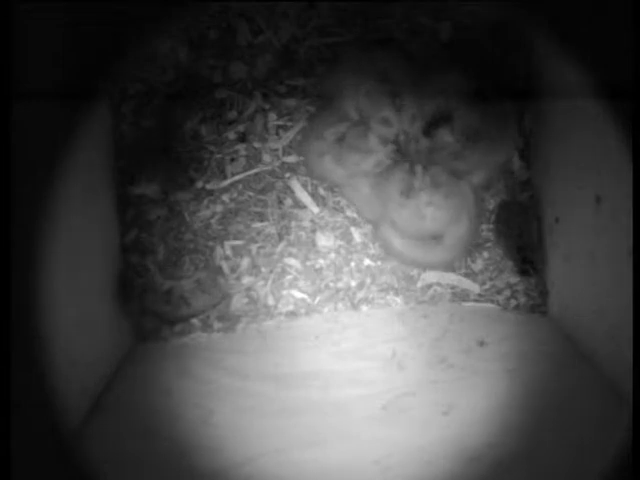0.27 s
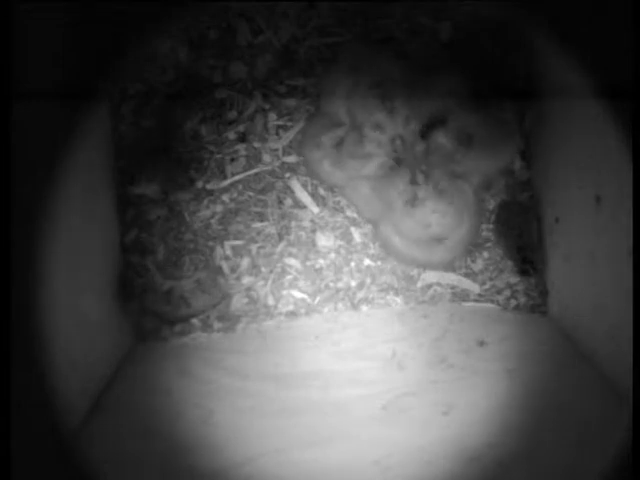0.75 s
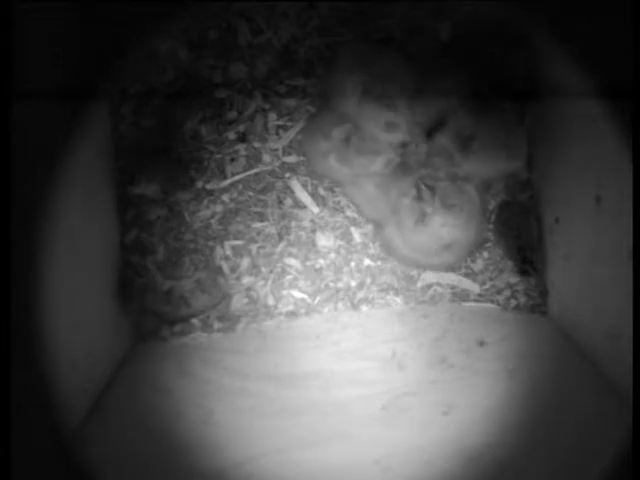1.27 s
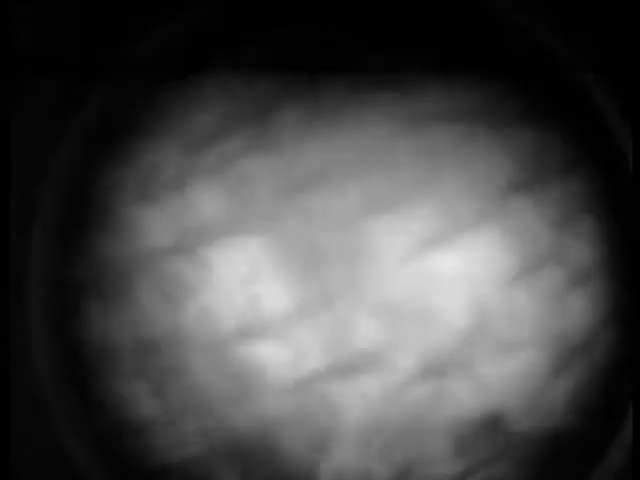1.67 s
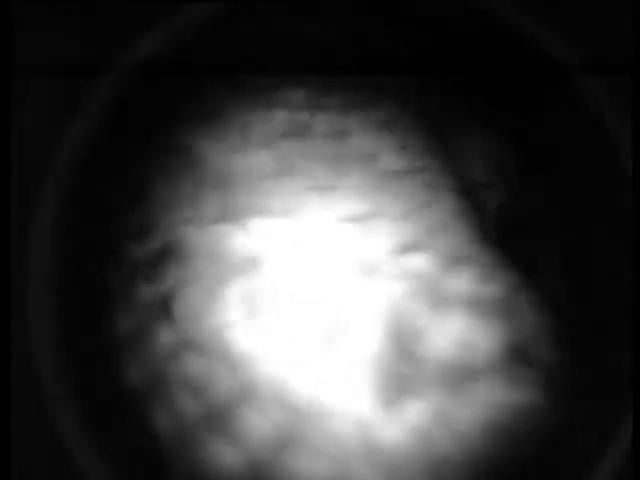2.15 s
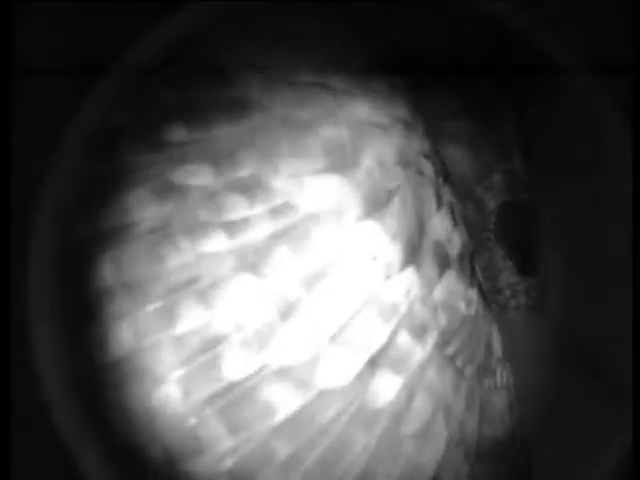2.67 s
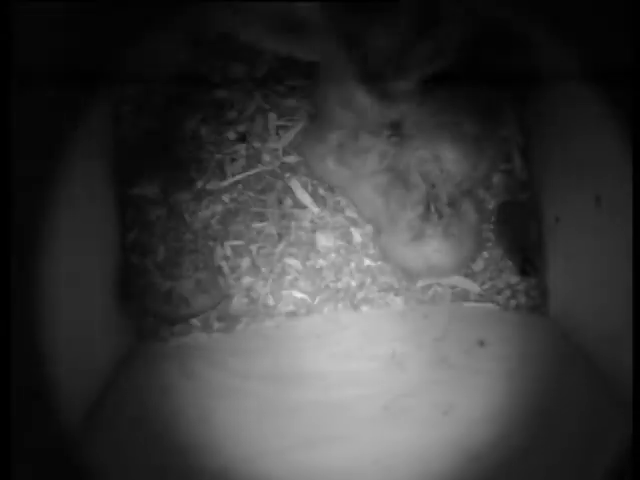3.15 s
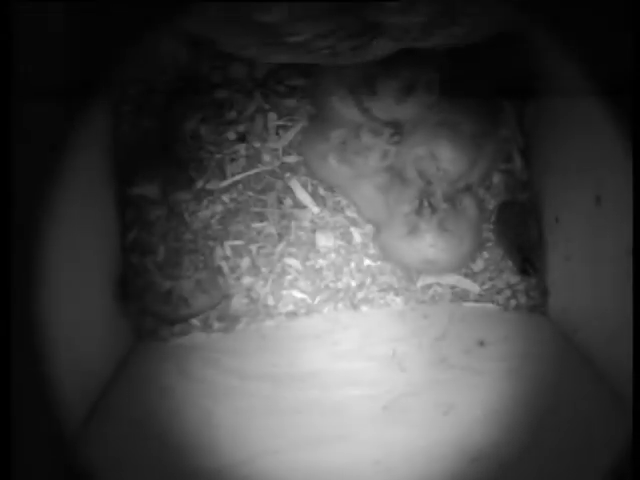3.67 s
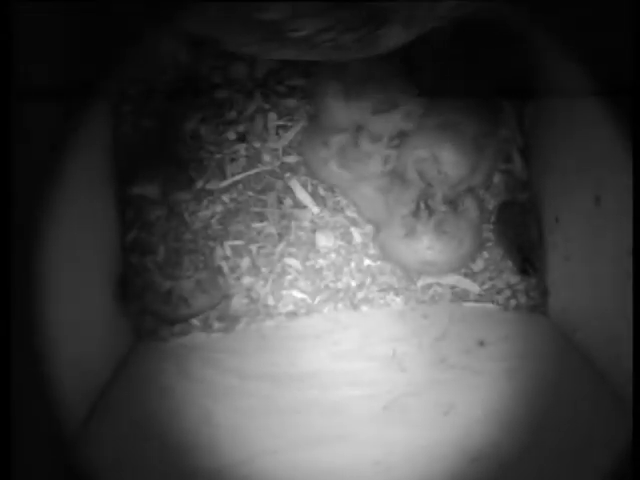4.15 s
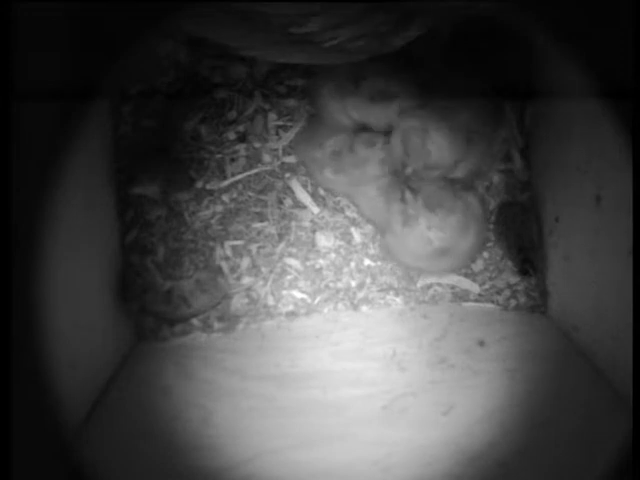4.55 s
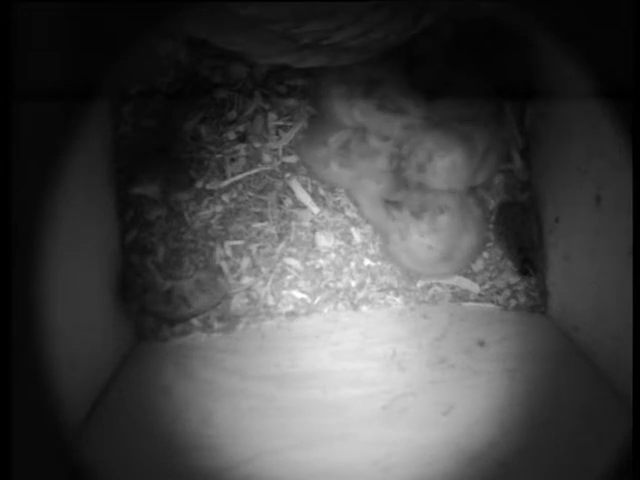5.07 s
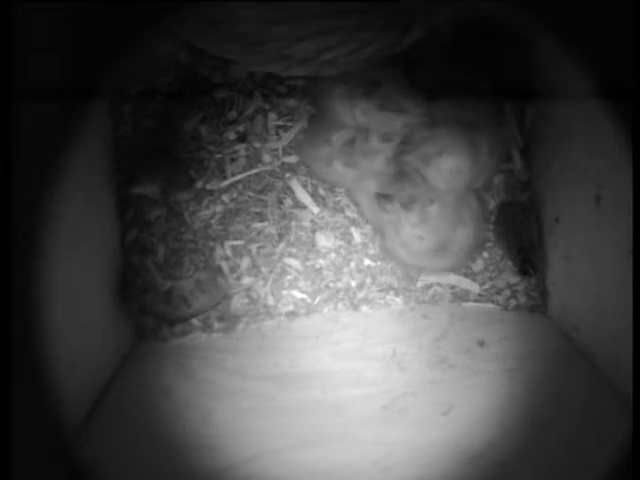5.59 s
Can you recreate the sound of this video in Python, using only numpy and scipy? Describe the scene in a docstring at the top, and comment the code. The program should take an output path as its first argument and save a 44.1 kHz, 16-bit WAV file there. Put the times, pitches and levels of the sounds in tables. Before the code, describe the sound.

In a buzzing nest box, owl chicks rasp briefly three times while a parent lands with hard knocks, scratches and feather rustle.

```python
"""In a wooden nest box, owl chicks beg: three hoarse hisses, resonated noise of throat and beak,
each with a thin gliding tone, the whistle, that breaks through and slides down.
A parent lands, knocks and scrabbles on the boards (struck modes, dense grains) and brushes past the nest
camera with its feathers (coloured noise). The camera's one microphone feeds the left channel,
over the buzz and line whistle of its picture signal; the right channel carries only a faint hiss."""
import sys
import numpy as np
from scipy import signal
from scipy.fft import rfft, irfft, next_fast_len
from scipy.io import wavfile

SR = 44100
rng = np.random.default_rng(int(sys.argv[2]) if len(sys.argv) > 2 else 0)


def dump(signal):
    """Clip the signal to [-1, 1] and save it as 16-bit WAV at the path in sys.argv[1]."""
    limited = np.clip(np.atleast_2d(signal).T, -1, 1)
    pcm = np.round(limited * 32767).astype(np.int16)
    wavfile.write(sys.argv[1], SR, pcm)


N = 256662
TIME = np.arange(N) / SR
# Levels in tables and settings are relative: the mixing gains and the microphone's gain come on top.


def from_db(db):
    """Decibels to gain."""
    return 10 ** (np.asarray(db) / 20)


def rms_one(x):
    """Scale to unit power."""
    return x / np.sqrt(np.mean(x ** 2) + 1e-20)


def in_time(rows, t):
    """The columns of a curve at times t."""
    s, *columns = np.transpose(rows)
    return [np.interp(t, s, c) for c in columns]


def add(out, s, x):
    """Mix x in at time s."""
    i = max(int(s * SR), 0)
    out[i:i + len(x)] += x[:N - i]


def band(x, edges):
    """Causal band-pass."""
    return signal.sosfilt(signal.butter(2, edges, "band", fs=SR, output="sos"), x)


def noise(spectrum, n):
    """Noise of a given colour, rms 1."""
    hz, db = np.transpose(spectrum)
    size = next_fast_len(n)
    f = np.maximum(np.arange(size // 2 + 1) * SR / size, 1)
    colour = from_db(np.interp(np.log(f), np.log(hz), db, left=-80))
    white = rfft(rng.standard_normal(size))
    return rms_one(irfft(white * colour, size)[:n])


def drift(rate, n):
    """Chance values, `rate` a second, joined by straight lines; rms 1."""
    at = np.arange(n) * rate / SR
    count = int(at[-1]) + 2
    return rms_one(np.interp(at, np.arange(count), rng.standard_normal(count)))


def resonate(x, resonances):
    """Parallel resonances with alternating signs; rms 1."""
    out = 0
    for k, (hz, width, db) in enumerate(resonances):
        r = np.exp(-np.pi * width / SR)
        poles = [1, -2 * r * np.cos(2 * np.pi * hz / SR), r * r]
        ring = (1 - r * r) * signal.lfilter([1, 0, -1], poles, x)
        out = out + (-1) ** k * from_db(db) * ring
    return rms_one(out)


def ramps(t, length, attack_s, release_s):
    """Straight attack, hold and release within the given length."""
    return np.clip(np.minimum(t / attack_s, (length - t) / release_s), 0, 1)


def gesture(s, length, attack_s, release_s):
    """A movement that builds up, holds and dies away."""
    rise = np.clip((TIME - s) / attack_s, 0, 1)
    return rise * np.exp(-np.clip((TIME - s - length) / release_s, 0, 20))


def bell(t, width):
    """A smooth hump of height 1 around t = 0."""
    return np.exp(-(t / width) ** 2)


def tone(hz, db, rough, jitter, jitter_rate, flutter_db, octave_db):
    """A gliding tone with its octave; roughness shakes both pitch and strength."""
    shaken_hz = hz * (1 + jitter * rough * drift(jitter_rate, len(hz)))
    phase = 2 * np.pi * np.cumsum(shaken_hz) / SR
    level = from_db(db + flutter_db * rough * drift(jitter_rate / 2, len(hz)))
    return np.sqrt(2) * level * (np.sin(phase) + from_db(octave_db) * np.sin(2 * phase))


ACCENT_S, CHIRP_DB, HISS_ACCENT_DB = 0.0218, 16.5, 7   # a call starts with a brief accent
BURIED_DB, BURIED_SWELL_DB, BURIED_ROUGH = -55.5, 13, 0.3965   # the high voice while lost in the hiss
BREAK_S, WHISTLE_SWELL_DB = 0.00275, 4.5   # how fast the whistle breaks through; it grows with the push
LOW_VOICE_HZ, LOW_BUILD_S, LOW_BUILD_DB = 4548, 0.0922, 25.5   # the low voice builds up towards the end
SWELL_S, BEAK_SWELL_DB = 0.0556, 9.5   # the hiss swells around the push for about this long
# Begging calls in the box, each with one late push of effort: (time [s], length [s], push after [s],
# push width [s], rest pitch [Hz], top pitch [Hz], pitch dip at the push [Hz], whistle clear after [s],
# whistle length [s], whistle level [dB], its roughness [0-1], low voice level [dB], its roughness [0-1],
# throat hiss level [dB], beak hiss level [dB], throat swell [dB])
BEGGING_CALLS = [(.651, .256, .186, 0.042, 4008, 7177, 920, 0.1617, 0.0478, -39.5, 0.08, -36.5, 0.19, -43, -54.5, 0),
                 (2.365, 0.2518, .222, .050, 3625, 7888, 1600, 0.1605, 0.0684, -33.5, 0.18, -35, .42, -49.5, -48, 3.5),
                 (4.176, .285, 0.2024, 0.033, 3670, 7774, 1905, 0.1443, 0.1302, -37.5, .27, -52, 0.63, -48, -52.5, 8)]


def chicks():
    """Each call opens with an accent; a late push swells the hiss and bends the clear whistle down."""
    out = np.zeros(N)
    for (s, length, push_s, push_width, rest_hz, top_hz, dip_hz, clear_s, clear_length, clear_db, rough,
         low_db, low_rough, throat_db, beak_db, swell_db) in BEGGING_CALLS:
        t = TIME[:int(length * SR)]
        accent = np.exp(-t / ACCENT_S)
        push = bell(t - push_s, push_width)
        swell = bell(t - push_s, SWELL_S)

        # 0 while the high voice is buried, 1 while it whistles clear
        opening = np.tanh((t - clear_s) / BREAK_S)
        closing = np.tanh((t - clear_s - clear_length) / BREAK_S)
        clear = (opening - closing) / 2
        buried_db = BURIED_DB + CHIRP_DB * accent + BURIED_SWELL_DB * swell
        high_db = buried_db + (clear_db + WHISTLE_SWELL_DB * push - buried_db) * clear
        high_rough = BURIED_ROUGH + (rough - BURIED_ROUGH) * clear
        high = whistle(t, length, rest_hz, top_hz - dip_hz * push, high_db, high_rough)

        build_db = -LOW_BUILD_DB * (1 - bell(length - t, LOW_BUILD_S))
        low = whistle(t, length, rest_hz, LOW_VOICE_HZ, low_db + build_db + CHIRP_DB * accent, low_rough)

        throat_now_db = throat_db + HISS_ACCENT_DB * accent + swell_db * swell
        beak_now_db = beak_db + HISS_ACCENT_DB * accent + BEAK_SWELL_DB * swell
        add(out, s, high + low + hiss(t, length, throat_now_db, beak_now_db))
    return out


def whistle(t, length, rest_hz, held_hz, db, rough, ramp_s=0.0043, rise_s=.011, fall_s=.016):
    """One voice of the syrinx: it tenses up to its held pitch and slackens as the call ends."""
    tension = (1 - np.exp(-t / rise_s)) * (1 - bell(length - t, fall_s))
    hz = rest_hz + (held_hz - rest_hz) * tension
    voice = tone(hz, db, rough, jitter=0.0697, jitter_rate=2200, flutter_db=11.5, octave_db=-29.5)
    return ramps(t, length, ramp_s, ramp_s) * voice


THROAT_ATTACK_S, THROAT_RELEASE_S, BEAK_RAMP_S = 0.0287, 0.0292, 0.0089
# Resonances of a chick's throat: (frequency [Hz], width [Hz], level [dB])
THROAT_RESONANCES = [(781, 235, -0.5), (1724, 237, -1.5), (2730, 515, -2), (3297, 398, 0.5),
                     (4333, 840, -3.5)]
# Resonances of its open beak: (frequency [Hz], width [Hz], level [dB])
BEAK_RESONANCES = [(5040, 107, 9.9), (5930, 310, 5.2), (6290, 183, 5.3), (7320, 1240, 2.7)]


def hiss(t, length, throat_db, beak_db, rasp_db=2.13, rasp_rate=600, air_db=-7,
         air_edges_hz=(1500, 9000), beak_edges_hz=(4300, 8600)):
    """Turbulent air through throat and open beak, rasping as the membranes flap."""
    rasp = from_db(rasp_db * drift(rasp_rate, len(t)))
    deep, front, air = rng.standard_normal((3, len(t))) * rasp
    throat = resonate(band(deep, (550, 9000)), THROAT_RESONANCES)
    throat = throat + from_db(air_db) * rms_one(band(air, air_edges_hz))
    beak = resonate(band(front, beak_edges_hz), BEAK_RESONANCES)
    throat_shape = ramps(t, length, THROAT_ATTACK_S, THROAT_RELEASE_S) ** 2
    beak_shape = ramps(t, length, BEAK_RAMP_S, BEAK_RAMP_S)
    return from_db(throat_db) * throat_shape * throat + from_db(beak_db) * beak_shape * beak


def walls(x, first=0.062, second=0.293, tail_db=-21, tail_t60=0.177):
    """Two early reflections, about 0.5 m and 1.3 m longer in path, and a faint tail colour the voices."""
    t = TIME[:SR // 4]
    tail = rng.standard_normal(len(t)) * from_db(-60 * t / tail_t60)
    echoes = from_db(tail_db) * signal.fftconvolve(x, tail / np.linalg.norm(tail))[:N]
    near = np.interp(TIME - .0015, TIME, x)
    far = np.interp(TIME - .0037, TIME, x)
    return x - first * near + second * far + echoes


# Zones of pitch in a knock: (low edge [Hz], high edge [Hz])
KNOCK_ZONES = [(400, 1500), (1500, 4200), (4200, 14000)]
EDGE_DB = 3   # the middle zone of every knock is raised
# Claws and beak on the wood: (time [s], level [dB], tilt from one zone to the next [dB], skid [s])
WOOD_KNOCKS = [(.971, -48, 0, 0.0028), (1.1147, -41, 2, 0.00463), (1.1735, -40, 5, 0.0042),
               (1.308, -44, 1.5, 0.00134), (1.361, -44, -1.5, 0.00168), (1.4165, -42.5, 3.5, 0.00152),
               (1.4441, -29, -0.5, 0.00645), (1.6399, -29, -9, 0.00072), (1.652, -24, -0.5, 0.0085),
               (1.6597, -19, -6, 0.00098), (1.671, -24.5, 0, 0.00288), (1.688, -30.5, -8, .0019),
               (1.709, -29.5, -5.5, 0.0026), (1.7209, -24.5, -5.5, 0.00189), (1.752, -31.5, -6, 0.00295),
               (1.8039, -25, 1, 0.00314), (1.9693, -40, -6, 0.00195), (2.008, -39, -5.5, 0.0058),
               (2.056, -37.5, -1, 0.0039), (2.0817, -41.5, -4, 0.00165), (2.104, -36, 3, 0.00177),
               (2.1182, -30, -2.5, .0056), (2.165, -29.5, 2.5, 0.00476)]


def knocks(strike=3, debris_db=-24, debris_s=0.00786, crack_db=-7, claw_db=-5, claw_hz=(1100, 6800),
           claw_width_hz=190, edges_hz=(850, 10500)):
    """A claw hits and skids: a short skid rings clear, a long one scratches."""
    out, t = np.zeros(N), TIME[:SR // 5]
    for s, level_db, tilt_db, skid_s in WOOD_KNOCKS:
        skid = rng.standard_normal(len(t)) * t / skid_s * np.exp(1 - 2 * t / skid_s)
        # debris rattles on for a moment after the contact
        debris = rng.standard_normal(len(t)) ** 3 * np.exp(-t / debris_s)
        skid = skid + from_db(debris_db) * debris
        force = skid + strike * (t == 0)
        # each spot of plank or twig adds a few short, high resonances of its own
        spot = resonate(force, [(hz, claw_width_hz, 0) for hz in rng.uniform(*claw_hz, size=9)])
        boards = rms_one(box(force, BOX_MODES[5:], vary_db=4.0))
        sound = boards + from_db(claw_db) * spot + from_db(crack_db) * rms_one(skid)
        sound = band(sound, edges_hz)
        for edges, db in zip(KNOCK_ZONES, (-tilt_db, EDGE_DB, tilt_db)):
            part = band(sound, edges)
            start_level = np.std(part[:SR // 50])   # over the first 20 ms
            add(out, s, from_db(level_db + db) * part / start_level)
    return out


# Modes of the nest box: (frequency [Hz], level [dB], 60 dB decay time [s])
BOX_MODES = [(76.89, 2.5, 0.0705), (102.2, -6.5, 0.308), (179.47, -2.5, 0.0562), (278.06, -2, .18),
             (324.1, 0, 0.141), (434.4, -9, 0.1692), (597.6, -11.5, 0.1087), (684.6, -0.5, 0.0398),
             (899.2, 0, 0.0335), (997.3, 3.5, 0.0554), (1213, -5, 0.014), (1945, -11, 0.034),
             (2320, -15, 0.048), (3111, 0.5, 0.021), (3201.6, -1, 0.058)]


def box(force, modes, vary_db):
    """The boards ring as decaying modes; each place of contact favours other ones."""
    out = np.zeros(len(force))
    for hz, db, t60 in modes:
        r, w = from_db(-60 / (t60 * SR)), 2 * np.pi * hz / SR
        ring = signal.lfilter([0, np.sin(w)], [1, -2 * r * np.cos(w), r * r], force + 1e-18)
        out += from_db(db + vary_db * rng.standard_normal()) * ring
    return out


# Soft footfalls and bumps: (time [s], floor boom level [dB], board ring level [dB])
SOFT_BUMPS = [(.051, -17, -19), (.552, -37.5, -55.5), (.819, -27, -36.5), (1.176, -26.5, -37.5),
              (1.458, -24.5, -28), (1.638, -17, -19.5), (1.97, -47.5, -22), (2.01, -38, -19.5),
              (2.051, -23, -28.5), (2.117, -15.5, -24.5), (2.342, -32.5, -24), (2.646, -43, -31.5),
              (3.261, -62, -42.5), (4.465, -39, -60.5)]


def bumps(contact_s=0.003044, soft_hz=520):
    """Padded blows push the floor and reach only its lower modes."""
    out, t = np.zeros(N), TIME[:SR // 2]
    push = band(np.sin(np.pi * np.minimum(t / contact_s, 1)) ** 2, (55, soft_hz))
    for s, boom_db, board_db in SOFT_BUMPS:
        for modes, db in ((BOX_MODES[:2], boom_db), (BOX_MODES[2:6], board_db)):
            sound = box(push, modes, vary_db=2)
            add(out, s, from_db(db) * sound / np.abs(sound).max())
    return out


# The parent's feet drag through the litter: (time [s], length [s], level [dB])
FOOT_SCUFFS = [(0.936, 0.027, -46), (1.13, 0.0444, -40), (1.356, 0.0258, -43), (1.431, 0.0461, -35.5),
               (1.636, 0.0318, -21.5), (1.851, 0.0357, -41.5), (1.987, 0.076, -31), (2.104, 0.066, -30.5),
               (2.309, 0.0293, -41), (2.615, 0.0594, -43), (2.779, 0.0885, -50)]
SCUFF_ATTACK_S, SCUFF_RELEASE_S = .008, 0.02116
# Plumage sweeps past the camera, swelling and stopping short: (time [s], length [s], level [dB])
FEATHER_SWEEPS = [(2.251, 0.0964, -41), (2.833, 0.1197, -49.5)]
SWEEP_RELEASE_S = 0.0214
# Light rustle while the parent moves about: (time [s], level [dB])
LIGHT_RUSTLE = [(.85, -55.5), (1.35, -50.5), (1.6, -45), (1.95, -43.5), (2.2, -40.5), (2.4, -49.5),
                (2.72, -55.5), (2.95, -53), (3.15, -67), (3.7, -65)]
FEATHER_FOLLOW_DB = -14   # feathers stir with every move of the feet
# Colour of brushing feathers: (frequency [Hz], level [dB])
FEATHER_COLOUR = [(1200, -9.5), (2400, 10), (7500, 1), (10000, 0), (15000, -7.5)]


def shuffle(grains_per_s=1700, grain_db=3.5, scrape_db=-3, crunch_db=0, wood_edges_hz=(180, 1800),
            crunch_edges_hz=(270, 1500), feather_db=-1.5, flutter_db=3.0, crackle_db=-1):
    """Litter and claws tick densely on the boards while feathers brush the walls."""
    rustle_db, = in_time(LIGHT_RUSTLE, TIME)
    rustle = from_db(rustle_db) * (TIME > LIGHT_RUSTLE[0][0]) * (TIME < LIGHT_RUSTLE[-1][0])
    scuffs = sum(from_db(db) * gesture(s, length, SCUFF_ATTACK_S, SCUFF_RELEASE_S)
                 for s, length, db in FOOT_SCUFFS)
    sweeps = sum(from_db(db) * gesture(s, length, length, SWEEP_RELEASE_S)
                 for s, length, db in FEATHER_SWEEPS)
    scraping = np.hypot(rustle, scuffs)
    feathers = np.hypot(from_db(FEATHER_FOLLOW_DB) * scraping, sweeps)

    ticks = rng.random(N) < grains_per_s / SR
    strength = from_db(grain_db * np.minimum(rng.exponential(1, N), np.pi))
    grains = ticks * strength * rng.choice([-1, 1], N)
    boards = rms_one(box(band(grains, wood_edges_hz), BOX_MODES[2:], vary_db=2.5))
    wood = boards + from_db(crunch_db) * rms_one(band(grains, crunch_edges_hz))
    crackle = rms_one(band(grains, (1500, 7000)))
    brush = noise(FEATHER_COLOUR, N) + from_db(crackle_db) * crackle
    pressure = from_db(flutter_db * drift(130, N))
    return pressure * (from_db(scrape_db) * scraping * wood + from_db(feather_db) * feathers * brush)


# Claws sliding on the wood squeak: (time [s], length [s], pitch [Hz], glide [Hz], level [dB],
# roughness [0-1])
CLAW_SQUEAKS = [(2.189, 0.0967, 902, 78, -44, 0.33), (2.445, 0.101, 1019, -47.5, -44, 0.38),
                (2.786, 0.072, 1080, -32.5, -48, 0.01)]


def squeaks(ramp_s=0.02):
    """A sliding claw sticks and slips, heard as a short, faint gliding tone."""
    out = np.zeros(N)
    for s, length, hz, glide_hz, db, rough in CLAW_SQUEAKS:
        t = TIME[:int(length * SR)]
        glide = hz + glide_hz * t / length
        squeak = tone(glide, db, rough, jitter=0.07, jitter_rate=239, flutter_db=0.5, octave_db=-19.0)
        add(out, s, ramps(t, length, ramp_s, ramp_s) * squeak)
    return out


FRAME_HZ, LINE_HZ, BLANK_START_S = 50, 15625, .0152
FLOOR_DB = -55
# Colour of the microphone's noise floor: (frequency [Hz], level [dB])
FLOOR_COLOUR = [(59, -12.5), (100, 2.5), (126, -18.5), (243, -11), (523, -15.5), (877, -13.5), (2000, -24),
                (14000, -40.5)]


def camera(blank_s=0.0016, hum_db=-53, buzz_db=-49, line_db=-44, line_dip=0.25, tick_db=-45, hiss_db=-1):
    """Picture signal leaks: a line whistle dipping softly around each blanking, a buzz, ticks at each."""
    since = (TIME - BLANK_START_S) % (1 / FRAME_HZ)
    blank = (since < blank_s) * 1.
    hum = -np.sqrt(2) * np.cos(2 * np.pi * FRAME_HZ * since)
    buzz = -band(blank, (60, 900))
    ticks = band(np.diff(blank, prepend=0), (1000, 14000))   # both edges of the blanking
    line = np.sin(2 * np.pi * LINE_HZ * TIME) * (np.sqrt(2) + line_dip * hum)
    leak = from_db(hum_db) * hum + from_db(buzz_db) * buzz
    leak = leak + from_db(tick_db) * ticks + from_db(line_db) * line
    return leak + from_db(FLOOR_DB + hiss_db) * noise(FLOOR_COLOUR, N)


def scene():
    """Everything reaches one microphone; the unused right channel carries only a faint hiss."""
    microphone = walls(chicks()) + knocks() + bumps() + shuffle() + squeaks() + camera()
    return np.array([2 * microphone, from_db(-77) * noise(FLOOR_COLOUR, N)])


def record(dry, cutoff_hz=16300):
    """The input clips anything beyond full scale, then a steep low-pass cuts the top."""
    low_pass = signal.ellip(10, .1, 80, cutoff_hz, fs=SR, output="sos")
    return signal.sosfilt(low_pass, np.clip(dry, -1, 1))


dry = scene()
out = record(dry)
dump(out)
```